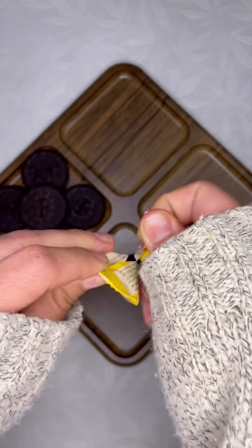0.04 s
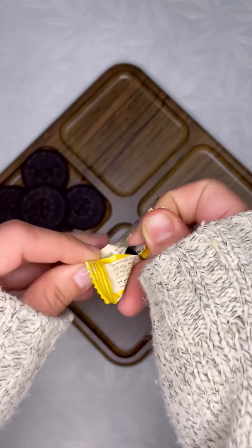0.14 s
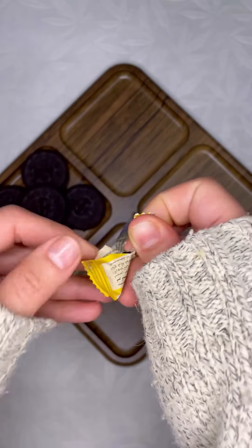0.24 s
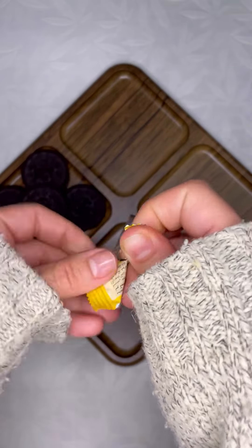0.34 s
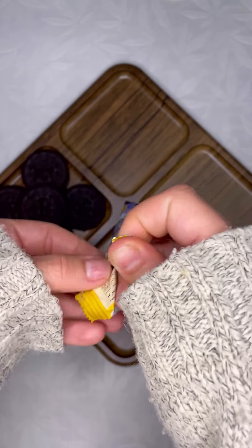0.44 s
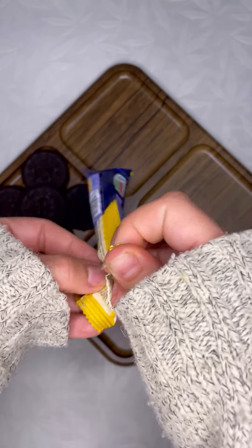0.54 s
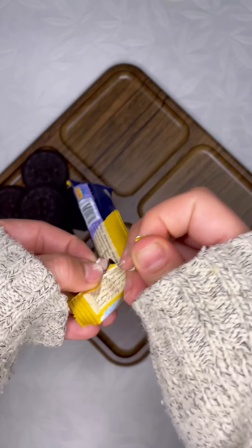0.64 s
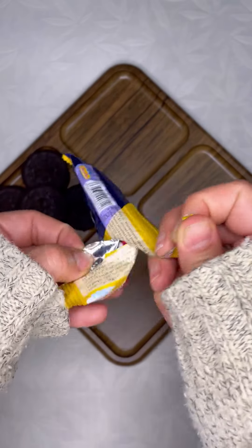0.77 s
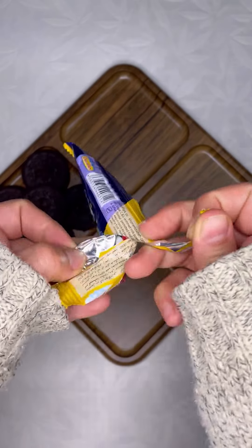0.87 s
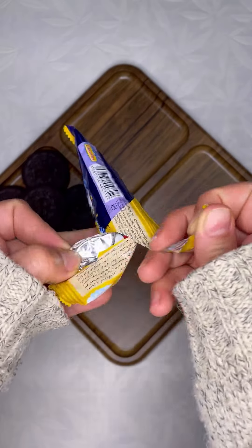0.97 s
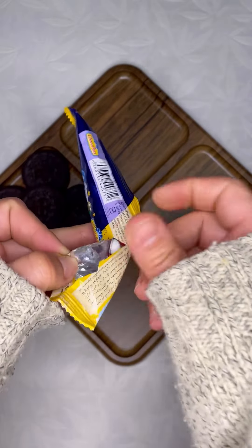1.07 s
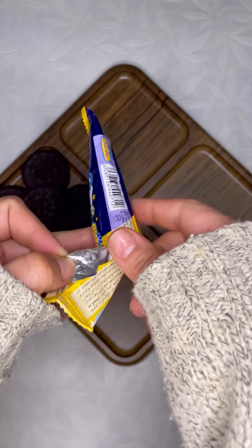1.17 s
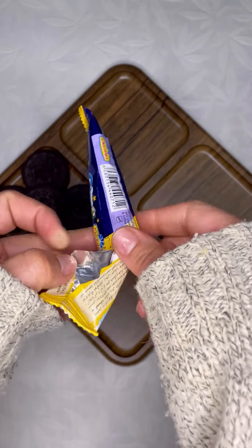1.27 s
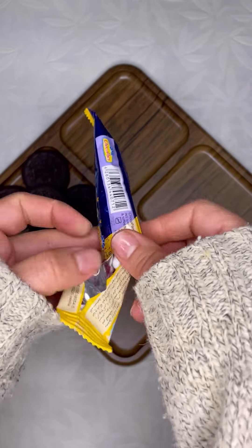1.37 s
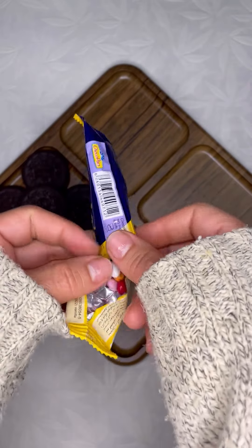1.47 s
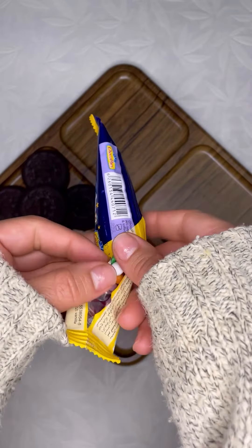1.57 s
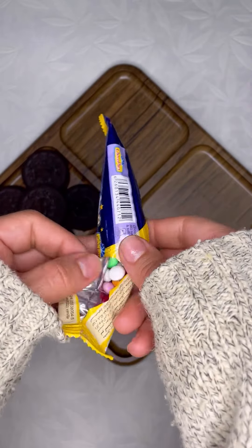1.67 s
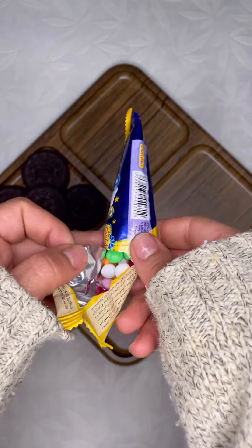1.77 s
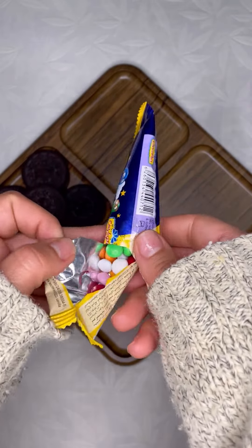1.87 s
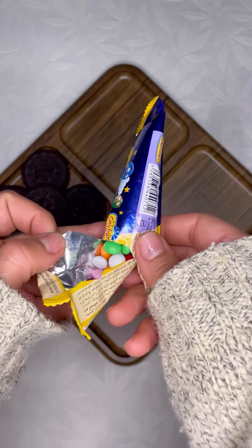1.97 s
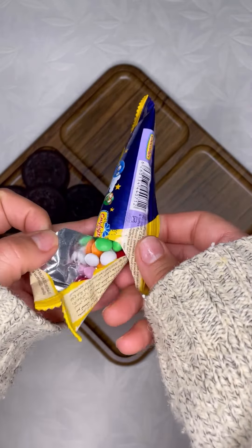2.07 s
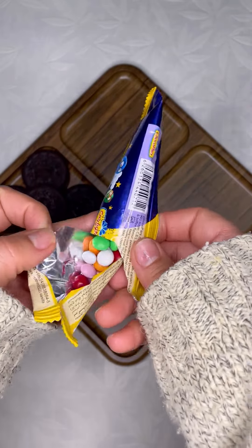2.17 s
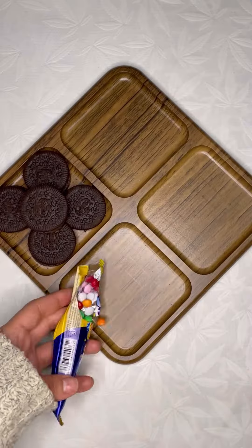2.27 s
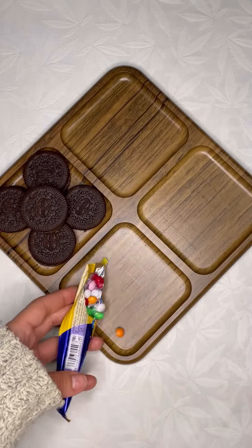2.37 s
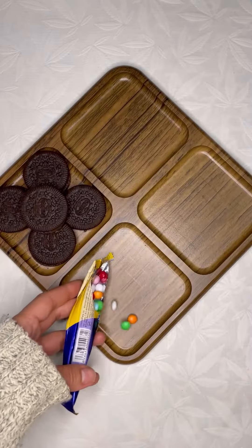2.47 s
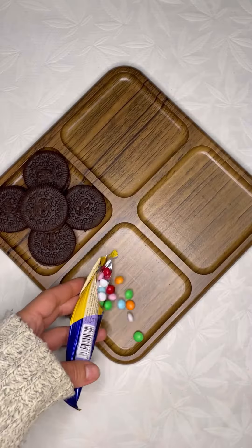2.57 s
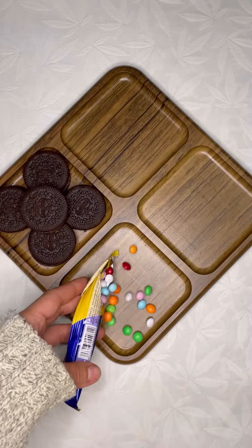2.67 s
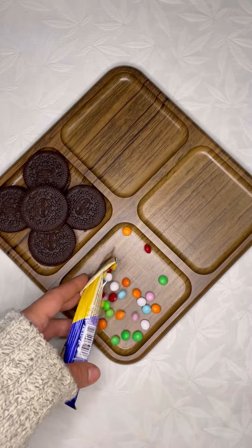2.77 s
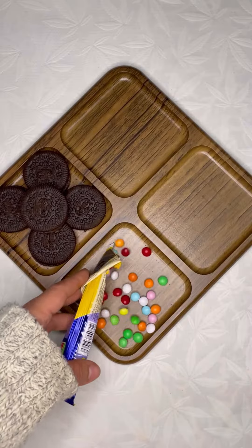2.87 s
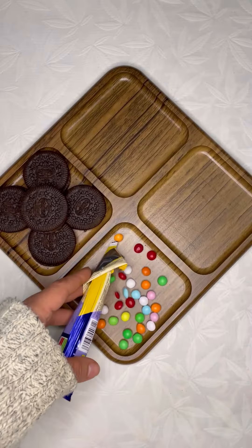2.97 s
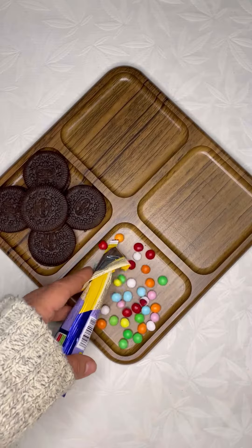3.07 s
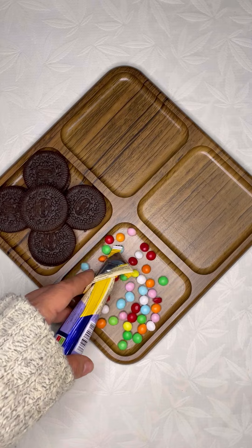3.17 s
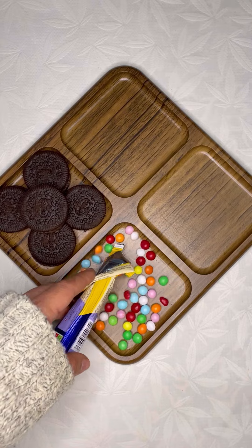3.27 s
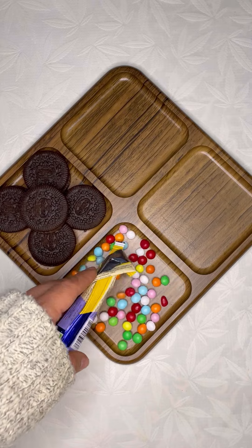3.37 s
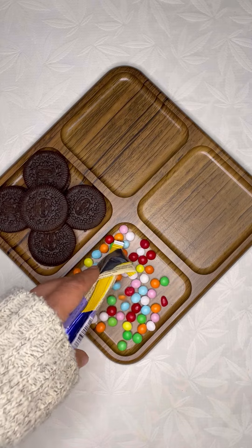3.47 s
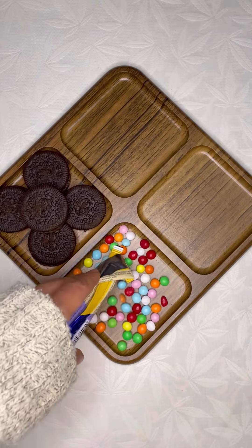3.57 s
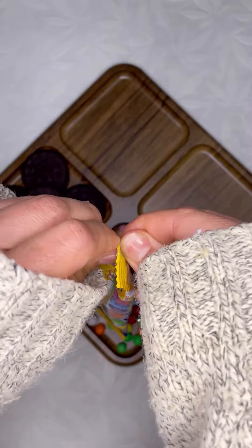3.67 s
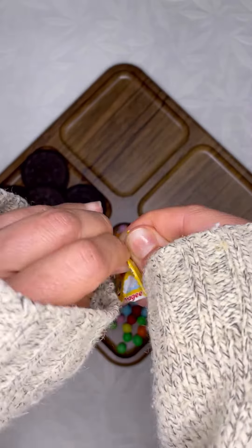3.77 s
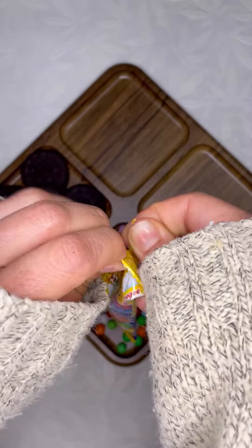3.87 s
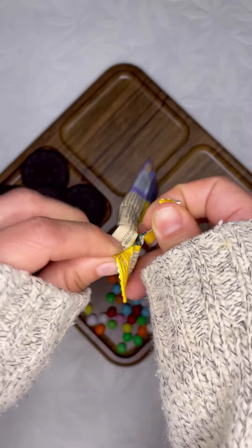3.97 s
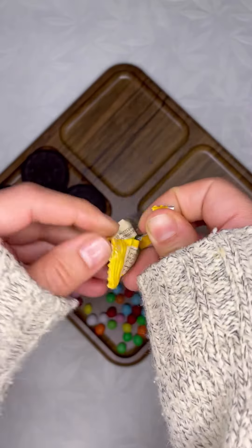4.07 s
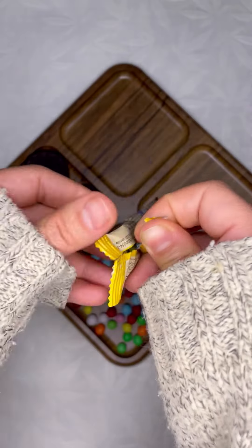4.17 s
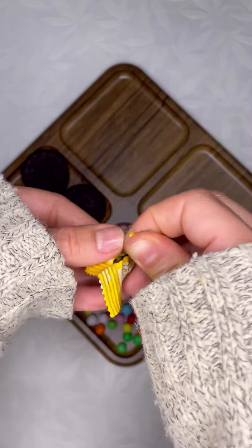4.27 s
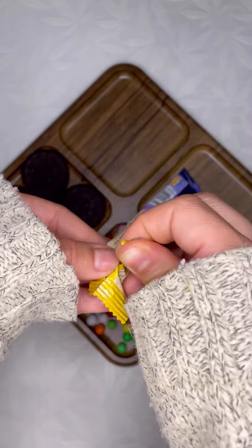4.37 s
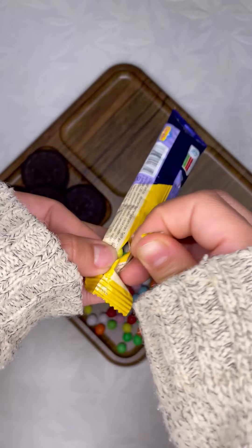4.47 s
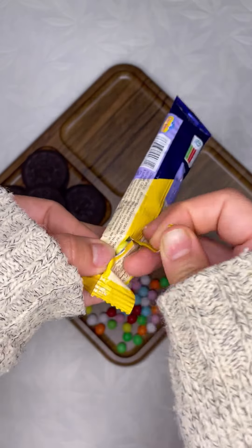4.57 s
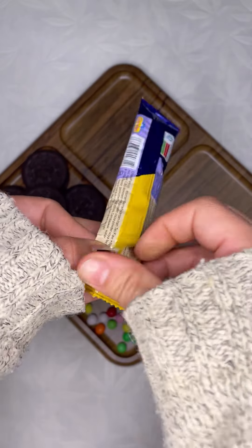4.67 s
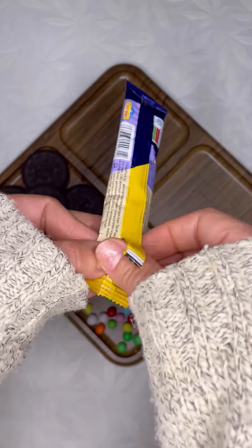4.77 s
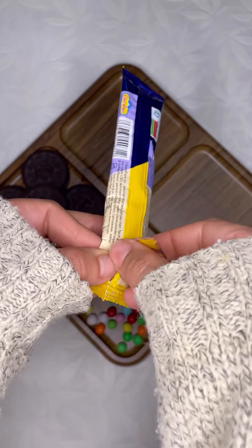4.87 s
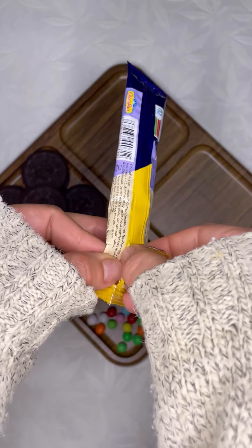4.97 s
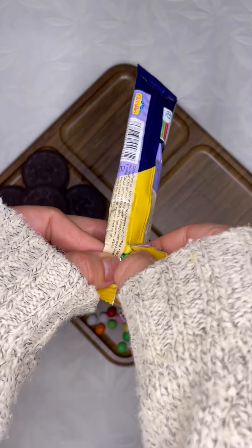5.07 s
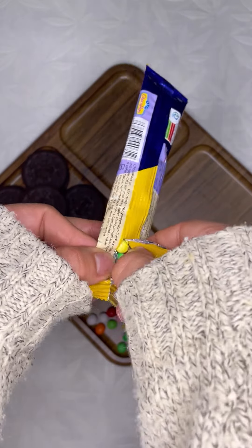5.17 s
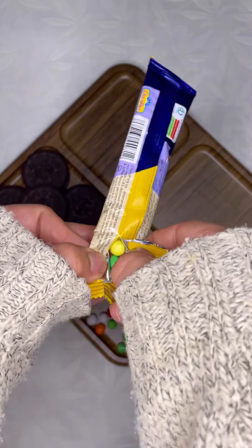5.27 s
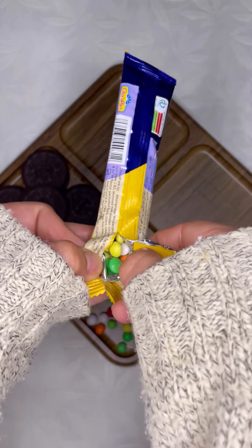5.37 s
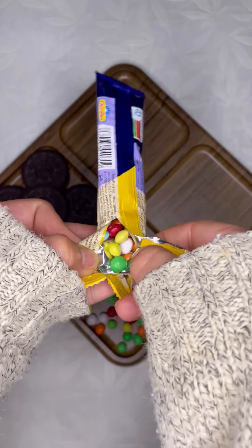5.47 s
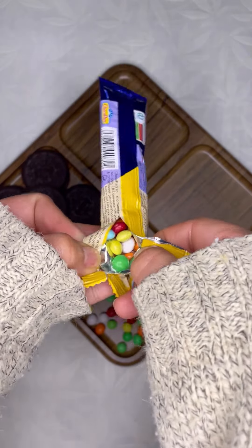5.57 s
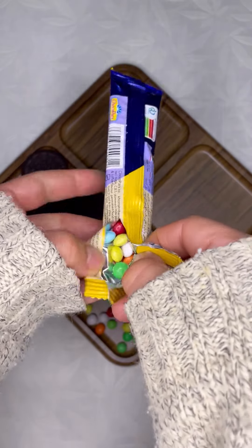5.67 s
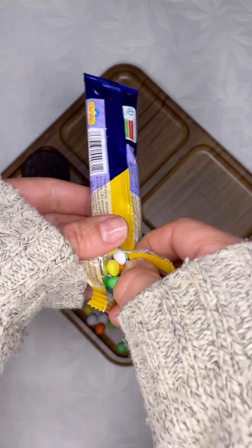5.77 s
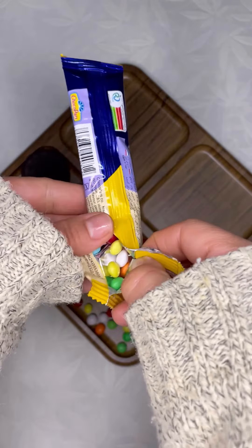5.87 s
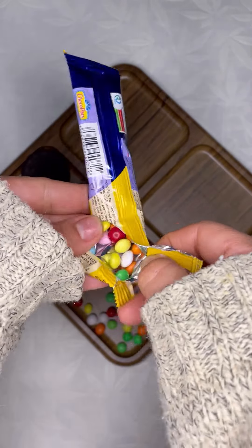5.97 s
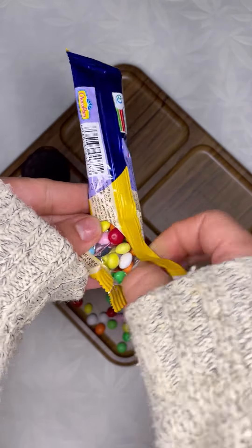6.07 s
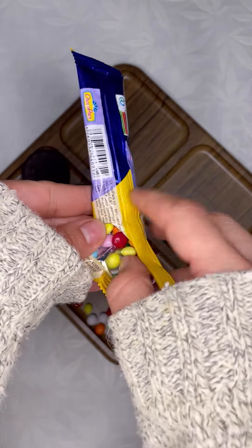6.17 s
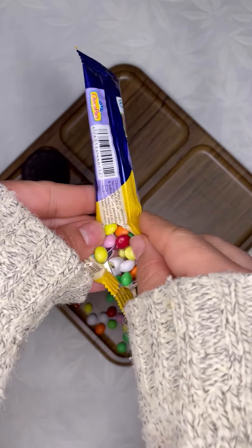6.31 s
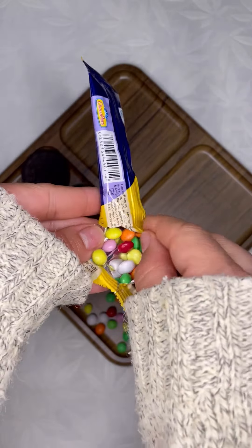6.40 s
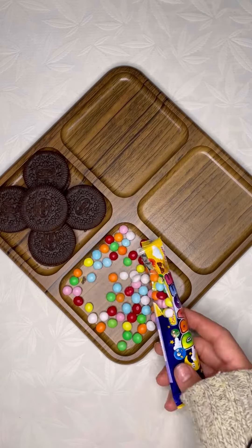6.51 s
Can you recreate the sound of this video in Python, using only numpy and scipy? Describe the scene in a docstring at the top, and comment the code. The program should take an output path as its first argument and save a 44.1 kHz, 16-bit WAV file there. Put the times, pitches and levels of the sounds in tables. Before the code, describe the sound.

From the start, a foil-plastic sweet packet is worked open by hand close to the microphone: sharp, irregular crackles over a thin rustle, with short scraping tears and the strongest snap at about 0.8 seconds. The crinkling thins out by 2.2 seconds. From 2.3 seconds, small sugar-coated sweets pour onto a wooden platter. Separate clicks quickly thicken into a dense, bright clatter, fuller than the wrapper, woody at first and glassier as the sweets strike one another. The pour peaks around 3.3 seconds and stops at about 3.6. From 3.7 seconds a second packet crackles, with brief hissy rips around 4 seconds, sharp snaps near 4.8 and 5.1, a cluster near 5.4 and lighter crinkling until 6.4. One last sweet clicks down at about 6.5 seconds. The room is small and dry, with a faint low rumble throughout.

```python
"""Sharp crackling, close by: two foil-plastic sweet packets are torn open by hand, one after the other.
Creases snap by buckling, and the film scrapes and rustles by stick-slip friction under the fingers.
Between the packets, sugar-coated beads pour and clatter into a wooden platter, each impact exciting
its resonances; one last bead falls at the end. Behind lies the low rumble of a small, quiet room."""
import sys
import numpy as np
from scipy import signal
from scipy.fft import rfft, irfft
from scipy.io import wavfile
from scipy.ndimage import uniform_filter1d

SR = 44100
rng = np.random.default_rng(int(sys.argv[2]) if len(sys.argv) > 2 else 0)


def put_to_file(sound):
    """Save the sound as 16-bit audio at rate SR, in the file named by the first command-line argument."""
    columns = np.atleast_2d(sound).T  # one column per channel
    safe = np.clip(columns, -1, 1)
    whole_steps = np.round(safe * 32767)
    wavfile.write(sys.argv[1], SR, whole_steps.astype(np.int16))


N = 288414
TIME = np.arange(N) / SR
HIT = 1024  # samples in one snap or impact
HIT_S, HIT_HZ = np.arange(HIT) / SR, np.maximum(np.fft.rfftfreq(HIT, 1 / SR), 1)
TOP_HZ = 15850
TOP_ROLLOFF = 1 / np.sqrt(1 + (HIT_HZ / TOP_HZ) ** 40)


# Loud creases: t/s, level/dB, facet resonance f/Hz, Q, broadband crack relative to the resonance/dB
LOUD_CREASES = [(0.008, -29.5, 3730, 0.26, -17), (0.0466, -40.5, 4510, 0.59, -9),
                (0.0771, -39, 1750, 0.71, -26), (0.0808, -36, 7800, 1.9, -26),
                (0.1175, -39, 9910, 1.3, -12), (0.1477, -26, 10100, 1.6, -28),
                (0.2147, -32.5, 13480, 0.33, -27), (0.2262, -31.5, 10700, 0.32, -35),
                (0.3038, -39.5, 11790, 1.0, -13), (0.3413, -26.5, 7510, 0.61, -21),
                (0.35, -34, 10010, 3.5, -6), (0.355, -30.5, 3390, 2.2, -15.5),
                (0.3827, -39.0, 2910, 1.9, -23), (0.4017, -44, 4550, 0.45, -14),
                (0.4696, -38.5, 13610, 0.97, -30), (0.537, -34.5, 1090, 5.5, -5),
                (0.6172, -30, 11170, 1.1, -20), (0.6362, -42, 3000, 0.21, -23),
                (0.6601, -35, 6730, 1.7, -33), (0.673, -28, 9390, 0.44, -29),
                (0.687, -31.0, 9100, 3.8, -10), (0.6968, -27.5, 8410, 1.9, -12.5),
                (0.7111, -36.5, 1100, 2, 8), (0.75, -32.5, 2580, 0.25, 2), (0.7716, -15, 14760, 0.21, -16),
                (0.7794, -28.5, 4800, 0.46, -19), (0.7855, -27.5, 5300, 1, -11),
                (0.881, -44.5, 5100, 1.5, -26), (0.8909, -45, 2180, 1.3, -31),
                (0.9493, -40.5, 14760, 0.34, -17), (0.9574, -32, 2920, 0.36, -11),
                (1.0135, -40.5, 3140, 3.9, -12), (1.0897, -33.0, 2940, 3.2, -9),
                (1.0952, -34, 8490, 3.1, -12), (1.143, -30.5, 1470, 3.5, -7), (1.1726, -30, 5160, 0.71, -4),
                (1.1977, -45, 13460, 6.0, -5), (1.2076, -38, 2180, 0.55, 0), (1.222, -33.0, 3700, 2.4, -11),
                (1.2974, -34.5, 14760, 0.5, -8), (1.355, -35.5, 7820, 1.2, -9),
                (1.3598, -27.5, 7260, 0.92, -12), (1.4512, -39, 9570, 0.43, -22),
                (1.4967, -30, 1610, 1.4, -9.5), (1.5187, -29, 8050, 3.6, -10),
                (1.545, -41, 7440, 0.42, -20), (1.5959, -37.0, 3650, 6.0, -9),
                (1.6019, -32, 4460, 1.0, -17), (1.7598, -36, 2020, 2.8, -10.5),
                (1.7772, -39.5, 1820, 3.4, -9), (1.8141, -37, 12530, 4.4, -6),
                (1.8262, -35.5, 6100, 1.8, -10), (1.9006, -41.5, 4540, 1.1, -10),
                (1.9475, -37, 2850, 0.2, -21), (2.0124, -43.5, 3080, 1.4, -19),
                (2.0535, -29.5, 8350, 1.3, -11), (2.1487, -38.5, 5230, 0.38, -28),
                (3.6756, -37.5, 3430, 2.4, -14), (3.7502, -29, 9800, 0.82, -8),
                (3.7938, -34.5, 2760, 1.9, -14), (3.7981, -38.5, 8500, 1.4, -22),
                (3.8377, -28, 14590, 0.2, -22), (3.8714, -36, 5810, 0.45, -29),
                (3.8765, -34.5, 9830, 1.5, -28), (3.8882, -35.5, 7260, 0.47, -13),
                (3.9127, -42.5, 3690, 0.55, -11), (3.9306, -30.5, 14760, 0.24, -28),
                (3.937, -34.5, 9280, 0.3, -25), (3.9519, -37, 3100, 3.7, -15), (3.955, -34, 8300, 2, -15),
                (3.9846, -33.5, 10210, 1.4, -18), (4.0627, -31.5, 10070, 0.15, -16),
                (4.0753, -30.0, 2960, 1.6, -9), (4.0935, -29, 8210, 1.6, -15),
                (4.0984, -35, 7900, 1.5, -26), (4.107, -37, 3660, 4.9, -31), (4.174, -40, 5740, 0.73, -30),
                (4.232, -43, 6250, 0.64, -24), (4.2523, -33, 7000, 0.57, -23), (4.2638, -35, 3880, 4, -32),
                (4.2788, -38, 14760, 0.49, -30), (4.3276, -37.0, 14760, 0.3, -27),
                (4.3603, -38.5, 7780, 0.61, -24), (4.379, -30.5, 14760, 0.26, -32),
                (4.4031, -46, 3210, 0.78, -21), (4.428, -41, 10640, 0.83, -26),
                (4.439, -31, 14760, 0.46, -27), (4.4457, -28.0, 7430, 1.6, -19),
                (4.4544, -34.5, 3860, 1.5, -10), (4.5284, -41.5, 13050, 1.4, -1),
                (4.6204, -36, 1310, 2.6, -9), (4.6347, -33.5, 8600, 0.7, -14),
                (4.6476, -35, 3220, 5.1, -11), (4.653, -34.5, 4700, 0.86, -10),
                (4.7005, -34, 7930, 3.8, -12), (4.7343, -37.0, 4890, 0.31, -12),
                (4.7624, -37, 1220, 4.2, -9), (4.7992, -22.0, 7650, 1.4, -19.5),
                (5.0113, -39.5, 7450, 1.0, -16), (5.036, -40.5, 6940, 0.34, 3),
                (5.1053, -19, 8250, 2.0, -32.5), (5.1139, -37, 12170, 0.7, -19),
                (5.1368, -31, 14760, 0.31, -24), (5.2547, -35.5, 14760, 0.32, -21),
                (5.272, -39.5, 9940, 0.7, -15), (5.4093, -30, 7800, 0.2, -22),
                (5.416, -29.5, 9000, 5.1, -13), (5.438, -28, 12280, 0.57, -16),
                (5.4525, -27.5, 14670, 1.9, -14), (5.5722, -36, 3830, 1.7, -15),
                (5.7118, -33.5, 14760, 0.26, -11), (5.7335, -34, 11340, 1.1, -35),
                (5.809, -44.5, 2450, 2.6, -8), (5.8764, -38.0, 3540, 3, -22),
                (5.9176, -32, 14760, 0.32, -18), (5.9868, -27.5, 5870, 0.73, -20),
                (6.0481, -37, 10040, 6.0, -12), (6.101, -31, 9480, 0.19, -23),
                (6.1163, -33.5, 1420, 0.43, -10), (6.257, -40, 10310, 0.63, -26.5),
                (6.331, -39.5, 13050, 1.5, -30), (6.3562, -38.5, 5650, 0.25, -23),
                (6.3666, -36.0, 13300, 1.1, -20), (6.378, -35.5, 3150, 1.1, -12.5)]

def creases(rows):
    """Snap-through buckling: a crease gives way with a broad crack and briefly rings the facet beside it."""
    out = np.zeros(N)
    for s, db, hz, q, crack_db in rows:
        cutoff_hz = 1080 * (hz / 4000) ** 0.15  # small facets radiate less bass
        radiated = np.hypot(resonance(hz, q), undb(crack_db)) / np.hypot(1, (cutoff_hz / HIT_HZ) ** 2)
        finger_echo_s = rng.uniform(0.00032, 0.00049)
        comb = np.exp(0.06 * np.cos(2 * np.pi * HIT_HZ * finger_echo_s))
        chatter = 0.72 * undb(np.interp(db, [-48, -30], [6, 0]))  # weak creases yield less suddenly
        response = minimum_phase(radiated * comb * TOP_ROLLOFF)
        add(out, s, undb(db) * strike(response, chatter, chatter_s=0.00099))
    return out


# Spans in which the fingers work each packet: start t/s, end t/s
GRIP_SPANS = [(0, 2.2), (3.7, 6.45)]

def faint_creases(per_s=19, usual_handling_db=-62, taut_s=0.032):
    """Rows for creases(): minor buckling follows the handling and eases as the film tautens to snap."""
    slots = np.concatenate([np.arange(start, end, 1 / per_s) for start, end in GRIP_SPANS])
    late, size, facet, sharpness = rng.uniform(-1.1, 1, (len(slots), 4)).T
    s = slots + (1 + late) / 2 / per_s
    loud_s = np.sort(np.append(np.array(LOUD_CREASES)[:, 0], np.inf))
    until_snap_s = loud_s[np.searchsorted(loud_s, s)] - s
    tautness = np.exp(-(until_snap_s / taut_s) ** 2)
    effort_db = np.mean(handling_db(s), axis=0) - usual_handling_db
    db = -47.5 + 0.89 * effort_db + size - 3.5 * tautness
    hz, q = 6760 * 2 ** (1.58 * facet), 0.74 * 2 ** sharpness
    crack_db = np.full(len(s), -12)
    return np.column_stack([s, db, hz, q, crack_db])


# Drags and tears: centre t/s, half-duration/s, level/dB, spectral tilt/(dB per octave)
FILM_DRAGS = [(0.088, 0.049, -55, -1), (0.228, 0.041, -50.5, 1), (0.347, 0.044, -68, -5),
              (0.705, 0.029, -48.5, -1.5), (0.76, 0.034, -46.5, 0.5), (1.094, 0.022, -48, -1),
              (1.149, 0.013, -49.5, -1), (1.52, 0.048, -53, -1), (1.829, 0.013, -45, -0.5),
              (3.761, 0.023, -50, 0), (3.944, 0.021, -38, 2.7), (3.984, .015, -48, -0.5),
              (4.092, 0.025, -42, 3.5), (4.455, 0.026, -72, 6), (4.638, 0.029, -56, 0),
              (5.143, 0.011, -52, 5), (5.443, 0.06, -51.5, 1), (5.614, 0.021, -50, -1),
              (6.111, 0.046, -53, -1), (6.202, 0.031, -57, -1.5)]

def scrapes(lo_hz=1000, hi_hz=15000):
    """Stick-slip friction: the film slides and tears in short swells of dense slips."""
    out = np.zeros(N)
    for s, half_s, db, tilt_db in FILM_DRAGS:
        size = int(2 * half_s * SR)
        hz = np.maximum(np.fft.rfftfreq(size, 1 / SR), lo_hz)
        tilt = undb(tilt_db * np.log2(hz / lo_hz))
        grains = irfft(rfft(slips(size, per_s=2500, spread_db=3)) * tilt, size)
        add(out, s - half_s, undb(db) * unit(band(grains, lo_hz, hi_hz)) * np.hanning(size))
    return out


# Knocks of the packet wall: t/s, relative level/dB, f/Hz
WALL_FLIPS = [(0.004, -33, 440), (0.348, -34.5, 443), (0.538, -56, 1120)]

def wall_knocks(gain_db=-11):
    """Panel buckling: a whole wall flips, and its heavily damped resonance gives a dull knock."""
    out = np.zeros(N)
    for s, db, hz in WALL_FLIPS:
        wall = minimum_phase(resonance(hz, q=1.6))
        add(out, s, undb(db + gain_db) * strike(wall, chatter=5.9, chatter_s=0.001))
    return out


# Handling strength, one curve a packet: t/s, relative level/dB of fine rustle, same of coarse rustle
HANDLING_CURVES = [
    [(0.0, -44, -38.5), (0.08, -71, -77), (0.3, -60, -62), (0.46, -57, -63), (0.59, -55.5, -72),
     (0.66, -62, -68), (0.74, -58, -59), (0.83, -59, -67), (1.33, -60.5, -63), (1.65, -57.5, -57.5),
     (1.86, -64, -66), (1.98, -69, -66), (2.14, -73, -75), (2.25, -58, -68)],
    [(3.67, -71, -69), (3.84, -59, -65), (3.96, -51.5, -66), (4.05, -56, -60.5), (4.4, -64, -77),
     (4.57, -58, -70), (4.63, -52, -55), (4.8, -62.5, -88), (5.08, -76, -74), (5.25, -63, -74),
     (5.82, -69, -70.5), (5.92, -60, -66.5), (6.06, -66, -56.5), (6.2, -57, -57), (6.38, -63, -73),
     (6.54, -62, -58)],
]

def rustle(per_s=520, spread_db=6.5, gain_db=-2):
    """Random excitation: small facets crackle under the fingers, alone or together, over smooth rubbing."""
    fine_db, coarse_db = handling_db(TIME)
    together = 1.6 * slips(N, per_s, spread_db)

    def facets(lo_hz, hi_hz, rubbing, count):
        """Adjacent pass bands, each driven by its own slips, the shared slips and noise; rms 1."""
        edges = np.geomspace(lo_hz, hi_hz, count + 1)
        out = np.zeros(N)
        for lo, hi in zip(edges, edges[1:]):
            force = slips(N, per_s, spread_db) + together + rubbing * rng.standard_normal(N)
            out += band(force, lo, hi)
        return unit(out)

    fine = facets(6460, 21200, rubbing=0.27, count=4) * undb(fine_db)
    coarse = facets(1750, 4780, rubbing=0.28, count=3) * undb(coarse_db)
    return undb(gain_db) * (fine + coarse)


def handling_db(s):
    """Amplitude envelopes of the fine and the coarse rustle at time s, in dB."""
    points_s, fine_db, coarse_db = np.vstack(HANDLING_CURVES).T
    return np.interp(s, points_s, fine_db), np.interp(s, points_s, coarse_db)


# Hardest landings: t/s, level/dB, contact hardness as tilt/(dB per octave), bed (0 wood, 1 other beads)
BEAD_LANDINGS = [(2.308, -24, -0.5, 0.22), (2.3885, -42.5, -6.5, 0.83), (2.4279, -24.5, -1.5, 0.036),
                 (2.438, -27.5, -0.5, 0), (2.4591, -33.5, 15, .2), (2.4791, -27, 0, 0.62),
                 (2.4824, -29, 0.5, 0), (2.5153, -30, -1, -0.5), (2.5455, -26.5, 0.5, 0),
                 (2.5543, -27, 1, 0), (2.5737, -23.5, 0, 0.26), (2.6048, -23.5, 1, 0),
                 (2.615, -25, 1, 0.27), (2.622, -23, -0.5, 0), (2.6417, -22.5, 0.5, .05),
                 (2.696, -26, 4.5, 0), (2.726, -28, 11, 0), (2.744, -22.5, -1, 0), (2.7941, -22, 0, 0),
                 (2.8296, -22, -0.5, .8), (2.857, -22.5, 2.5, 1), (2.8704, -23.5, 0.5, 0.02),
                 (2.8933, -30, 7, .4), (2.9255, -25, 2, 0), (2.9486, -20, 5, .9), (2.9573, -21, 2, 0),
                 (2.9848, -21.5, 4, 0.57), (3.0243, -22.5, 1.5, .7), (3.04, -24.5, 2, .3),
                 (3.0504, -24, -0.5, .8), (3.0721, -22.5, 0.5, 0.79), (3.0941, -23, 2, 0.52),
                 (3.0995, -22, -1.5, 0.79), (3.1294, -20.5, 2, 0.47), (3.1494, -31, 8, 0.9),
                 (3.1536, -21, 1, 1), (3.177, -24.5, -2.5, 0.97), (3.181, -21, 2.5, 0.28),
                 (3.212, -20, 3.5, 0.56), (3.2272, -24, -4, 1), (3.256, -24.5, 0.5, 1),
                 (3.26, -21, 2.5, 0.79), (3.2832, -22, 1.5, 0.68), (3.292, -20.5, -0.5, 0.85),
                 (3.3183, -17.5, 2, 0.74), (3.3378, -20.5, 1, 1), (3.355, -27, -1, 0.41),
                 (3.3785, -14, 5, 0.81), (3.403, -30.5, -1, 0.85), (3.4405, -23, 2, 0.56),
                 (3.4725, -34, -1, 0.86), (3.4899, -21.5, 1.5, 0.11), (3.529, -27, 2, .4),
                 (3.545, -28.5, 1.5, 0.96), (3.5606, -25.5, 2, 0.096), (3.5935, -30, 3.5, 0.35),
                 (3.616, -30, 2.5, .4), (3.6322, -32, 2.5, .5), (6.5319, -20, 4, 0.41)]

def beads():
    """Impact excitation: sweets strike the wood and each other; harder contact gives more treble."""
    out = np.zeros(N)
    for s, db, tilt_db, bed in BEAD_LANDINGS:
        add(out, s, undb(db) * strike(platter(tilt_db, bed), chatter=2.13, chatter_s=0.00079))
    return out


# Strength of the pour: t/s, relative level/dB
POUR_CURVE = [(2.28, -81), (2.404, -55), (2.604, -41.5), (2.68, -33.5), (2.944, -33.5), (3.214, -33),
              (3.474, -43.5), (3.6, -40), (3.65, -69)]
# Covering of the platter's floor: t/s, bed (0 wood, 1 other beads)
BED_CURVE = [(2.5, 0.044), (2.78, 0.11), (3.05, 0.81), (3.38, 0.77), (3.6, 0.87)]

def jostle(count, gain_db, spread_db, tilt_db):
    """Granular collisions: rolling beads knock at uneven moments, as strongly as the pour runs."""
    out = np.zeros(N)
    pour_s, pour_db = np.transpose(POUR_CURVE)
    slots, gap_s = np.linspace(pour_s[0], pour_s[-1], count, endpoint=False, retstep=True)
    for s, (late, size, hardness) in zip(slots, rng.uniform(-0.76, 1, (count, 3))):
        gain = undb(np.interp(s, pour_s, pour_db) + gain_db + spread_db * size)
        bed = np.interp(s, *np.transpose(BED_CURVE)) + 0.59 * rng.uniform(-1.1, 1)
        response = platter(tilt_db + 2 * hardness, np.clip(bed, 0, 1))
        add(out, s + gap_s * (1 + late) / 2, gain * strike(response, chatter=2.3, chatter_s=0.00079))
    return out


# Resonances of an impact: f/Hz, half-width/Hz, relative level/dB on wood, same on other beads
IMPACT_MODES = [(285, 63, -4.5, -10.5), (867, 210, -6.5, -6), (1549, 146, 0.5, -2), (2000, 240, -3.5, -8),
                (2615, 97, 5, -5), (2866, 66, 7, -8), (3190, 260, 3, -5), (4088, 265, 3, 9.5),
                (4910, 50, 2, -8), (5300, 83, -5, 4), (5460, 215, 6, -0.5), (6690, 490, -1, -1),
                (8230, 290, -1, 3.5), (8850, 590, -0.5, -12), (9820, 460, -2, -2),
                (11340, 1200, -10.5, -24), (12030, 1250, -10.5, -1), (15000, 1900, -7, -19.5)]

def platter(tilt_db, bed, scatter_db=2, detune=0.007):
    """Modal superposition: one impact's spectrum, woody on the platter, glassier on other beads."""
    hz, width_hz, wood_db, bed_db = np.transpose(IMPACT_MODES)
    size, shift = rng.uniform(-1.7, 1.7, (len(hz), 2)).T  # no two impacts are alike
    weight = undb(wood_db + bed * (bed_db - wood_db) + scatter_db * size * np.minimum(hz / 3000, 1))
    peaks = 1 / (1 + ((HIT_HZ[:, None] - hz * (1 + detune * shift)) / width_hz) ** 2)
    tick = undb(-20) / np.hypot(1, (1100 / HIT_HZ) ** 2)
    hardness = undb(tilt_db * np.log2(np.maximum(HIT_HZ, 2000) / 4000))
    return minimum_phase(np.sqrt(peaks ** 2 @ weight ** 2 + tick ** 2) * hardness * TOP_ROLLOFF)


# Narrow modes of the wood: f/Hz, relative level/dB, decay time T60/s
WOOD_MODES = [(1463, -9, 0.21), (2360, -22, 0.074), (3130, -13, 0.1), (3860, -9.5, 0.16), (3850, -9, 0.24),
              (4140, -30, 0.074), (5470, -28, 0.21)]

def wood_ring(impacts, gain_db=-6):
    """Free vibration: lightly damped modes of the wood ring on faintly after each impact."""
    t = np.arange(SR // 8) / SR
    response = 0
    for hz, db, t60_s in WOOD_MODES:
        decay = undb(-60 * t / t60_s)
        response += undb(db + gain_db) * 2 * decay / decay.sum() * np.cos(2 * np.pi * hz * t)
    return impacts + signal.fftconvolve(impacts, response)[:N]


def room(direct, early_db, late_db, t60_s=0.064):
    """Reflection and reverberation: the table returns the sound after 6 ms, the walls add a short tail."""
    t = np.arange(SR // 2) / SR
    early = rng.standard_normal(len(t)) * np.exp(-t / 0.0011) * (t > 0.006)
    late = band(rng.standard_normal(len(t)), 200, 7700, order=1) * undb(-60 * t / t60_s) * (t > 0.01)
    echo = undb(early_db) * early / np.linalg.norm(early) + undb(late_db) * late / np.linalg.norm(late)
    return direct + signal.fftconvolve(direct, echo)[:N]


# Spectrum of the room's rumble: f/Hz, relative level/dB
RUMBLE_SPECTRUM = [(12, -17), (20, 5), (37, -6), (53, -8), (87, -7.5), (133, -9.5), (155, -23.5),
                   (174, -11.5), (189, -12.5), (235, -17), (290, -26), (316, -27), (426, -26), (499, -32),
                   (600, -35), (780, -35), (1320, -120)]

def background(rumble_db=-54, hum_hz=76, hum_db=-61, hiss_db=-70):
    """Stationary ambient noise: a low rumble, a faint pure-tone hum and a faint hiss."""
    hz, db = np.transpose(RUMBLE_SPECTRUM)
    freqs = np.maximum(np.fft.rfftfreq(N, 1 / SR), 1)
    shape = undb(np.interp(np.log(freqs), np.log(hz), db, right=-90))
    rumble = unit(irfft(rfft(rng.standard_normal(N)) * shape, N))
    hum = np.sqrt(2) * np.sin(2 * np.pi * hum_hz * TIME)
    hiss = unit(band(rng.standard_normal(N), 200, 9000, order=1))
    return undb(rumble_db) * rumble + undb(hum_db) * hum + undb(hiss_db) * hiss


# Brief dips of the whole sound: start t/s, length/s (recovery begins halfway through)
LEVEL_DIPS = [(2.254, .026), (3.646, .026), (6.477, .018)]

def dips(depth_db=-22, recover_s=0.021):
    """Amplitude modulation: a gain that falls at once, holds briefly and creeps back."""
    db = np.zeros(N)
    for s, length_s in LEVEL_DIPS:
        db += depth_db * (TIME > s) * np.exp(-np.maximum(TIME - s - length_s / 2, 0) / recover_s)
    return undb(uniform_filter1d(db, size=40))


def strike(response, chatter, chatter_s):
    """Source and filter: an impulse with dying chatter drives a response; rms 1 over the first 3 ms."""
    force = rng.standard_normal(HIT) * np.exp(-HIT_S / chatter_s)
    force *= chatter / np.linalg.norm(force)
    force[0] += 1
    spectrum = rfft(force)
    colour = np.sqrt(uniform_filter1d(np.abs(spectrum) ** 2, size=21))
    sound = irfft(spectrum * minimum_phase(1 / colour) * response)  # spread in time, same timbre
    return sound / np.sqrt(np.mean(sound[:int(0.003 * SR)] ** 2))


def slips(size, per_s, spread_db):
    """Poisson process: tiny clicks of uneven strength at random moments; rms 1."""
    strengths = undb(spread_db * np.minimum(rng.exponential(size=size), 4)) * rng.choice([-1, 1], size)
    return unit(strengths * ((rng.random(size) < per_s / SR) + 1e-4))


def resonance(hz, q):
    """Resonance curve of a damped oscillator, 1 at its peak."""
    return 1 / (1 + q ** 2 * (HIT_HZ / hz - hz / HIT_HZ) ** 2)


def minimum_phase(gain):
    """Causality: the spectrum of the most sudden response that has these gains."""
    cepstrum = irfft(np.log(gain + 1e-5))
    cepstrum[1:HIT // 2] *= 2
    cepstrum[HIT // 2 + 1:] = 0
    return np.exp(rfft(cepstrum))


def band(x, lo_hz, hi_hz, order=2):
    """Band-pass filtering."""
    sos = signal.butter(order, [lo_hz, min(hi_hz, 0.48 * SR)], "bandpass", fs=SR, output="sos")
    return signal.sosfilt(sos, x)


def add(out, s, sound):
    """Superposition of a short sound at time s."""
    start = max(int(s * SR), 0)
    part = sound[:max(len(out) - start, 0)]
    out[start:start + len(part)] += part


def undb(db):
    """Level in decibels to amplitude ratio."""
    return 10 ** (np.asarray(db) / 20)


def unit(x):
    """Normalisation to rms 1."""
    return x / np.sqrt(np.mean(x ** 2))


def scene():
    """Direct-to-reverberant ratio: the packets are near; the platter, further off, carries more room."""
    film = creases(LOUD_CREASES) + creases(faint_creases()) + scrapes() + wall_knocks() + rustle()
    packets = room(film, early_db=-22.5, late_db=-26)
    firm_knocks = jostle(count=90, gain_db=4.5, spread_db=2, tilt_db=1.5)
    nudges = jostle(count=460, gain_db=-6, spread_db=9, tilt_db=-3)
    sweets = room(wood_ring(beads() + firm_knocks + nudges), early_db=-18, late_db=-24)
    return ((packets + sweets + background()) * dips())[None]


def record(dry):
    """Soft saturation and band limiting: the loudest peaks are rounded and the top treble is cut."""
    low_pass = signal.ellip(8, 0.2, 70, TOP_HZ, fs=SR, output="sos")
    return signal.sosfilt(low_pass, np.tanh(dry))


dry = scene()
out = record(dry)
put_to_file(out)
```